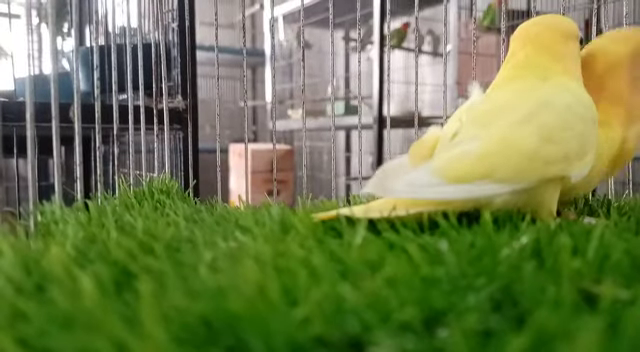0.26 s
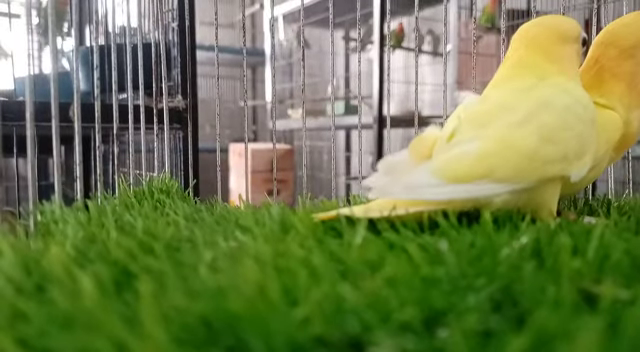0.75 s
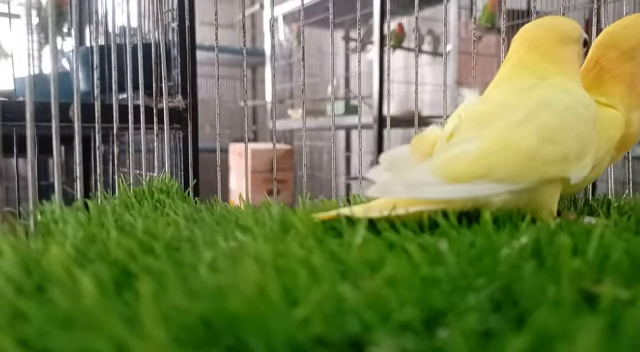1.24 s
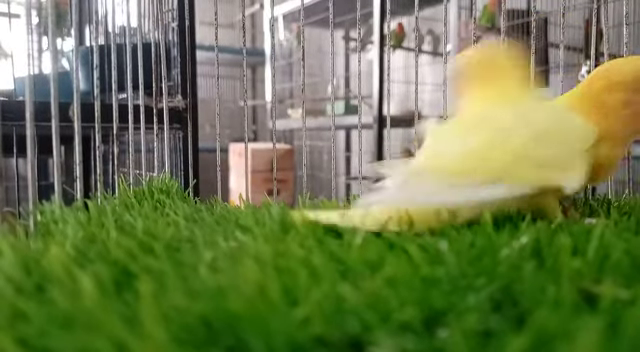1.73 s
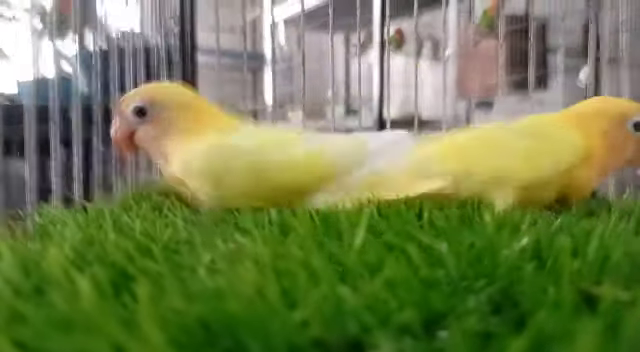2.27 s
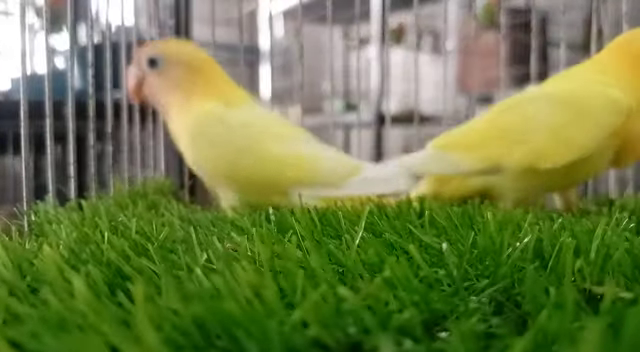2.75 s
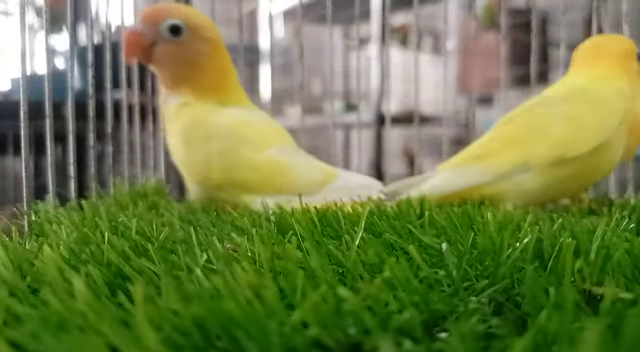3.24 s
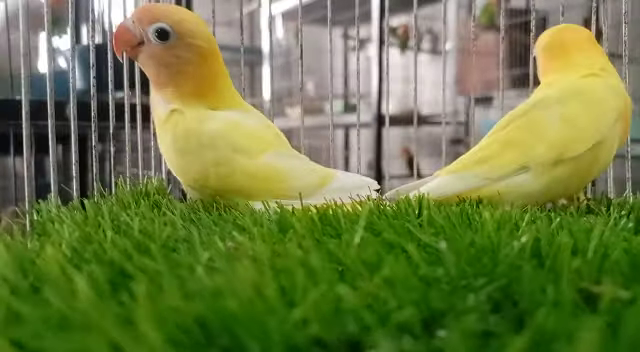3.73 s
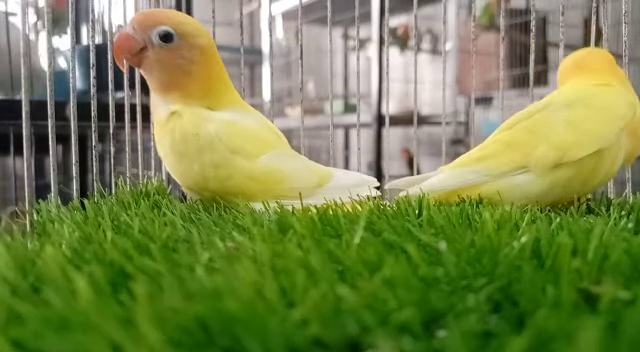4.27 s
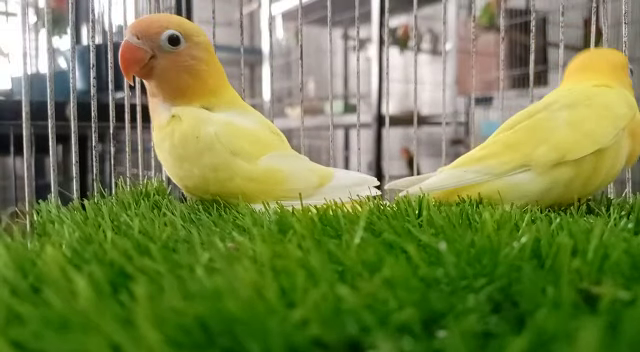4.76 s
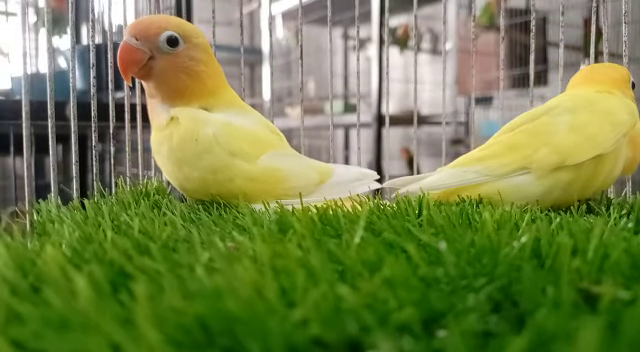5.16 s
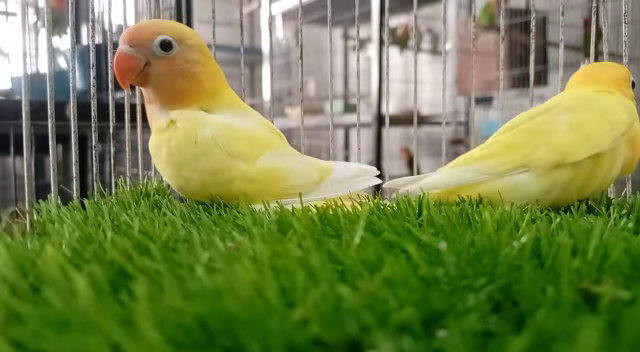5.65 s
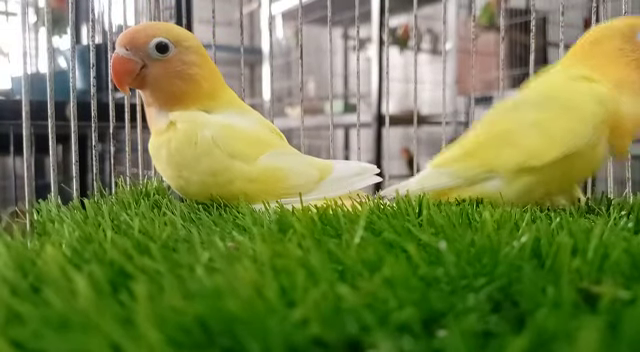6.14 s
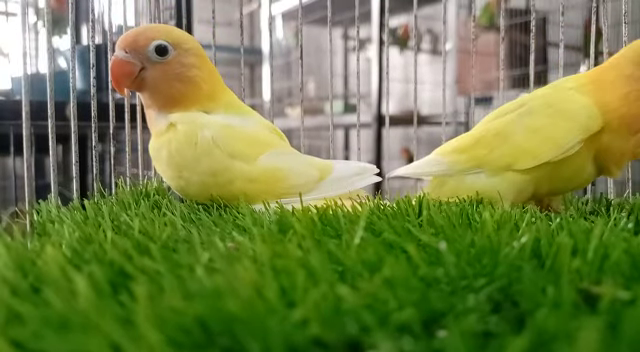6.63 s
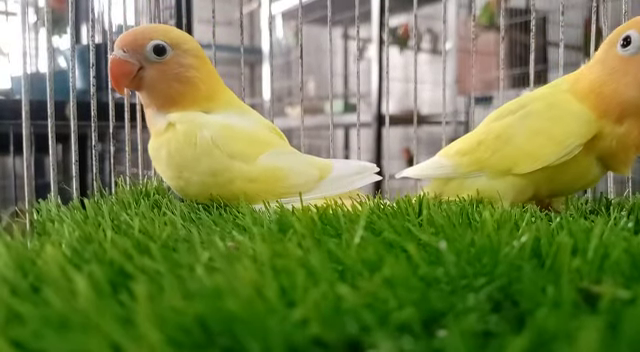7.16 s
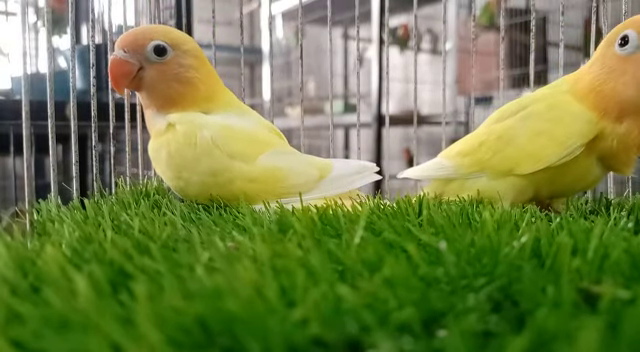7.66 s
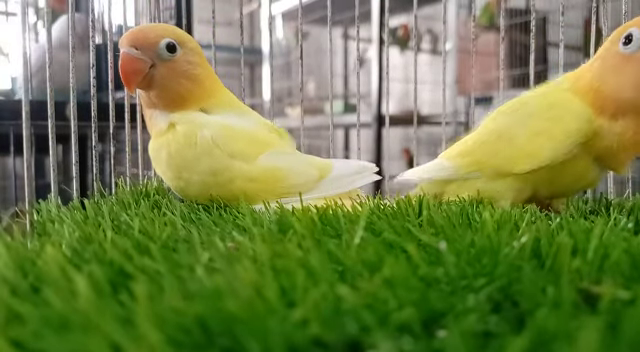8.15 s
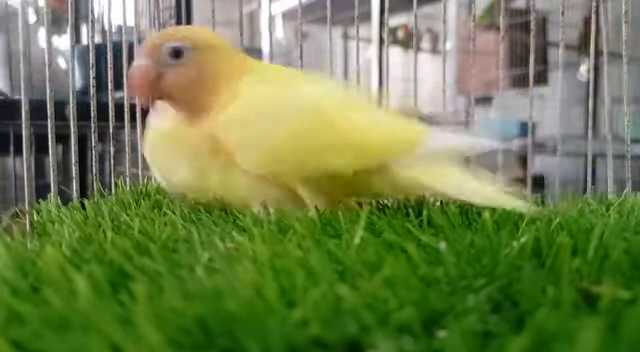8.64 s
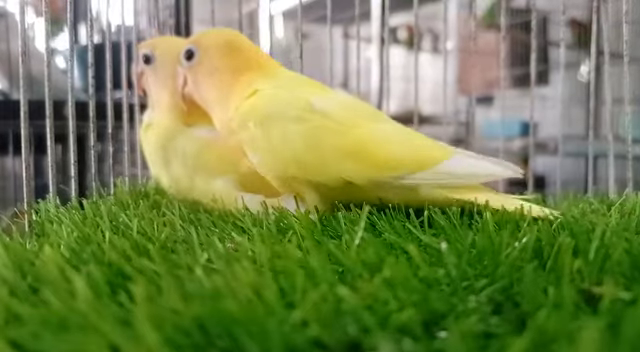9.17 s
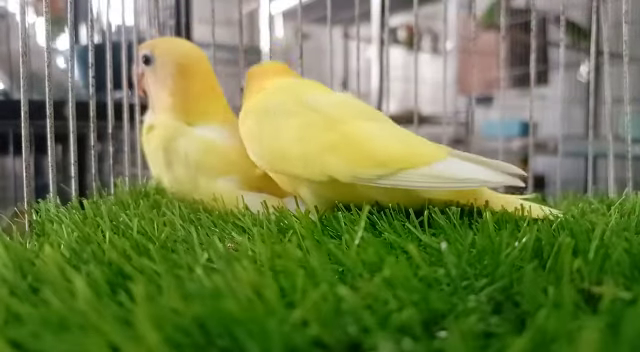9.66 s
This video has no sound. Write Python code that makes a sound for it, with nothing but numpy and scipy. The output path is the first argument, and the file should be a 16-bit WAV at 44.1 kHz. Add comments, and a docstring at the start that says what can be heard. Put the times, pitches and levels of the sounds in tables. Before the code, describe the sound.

Close, bright lovebird calls bounce off hard walls, with a reverberant flock behind. Fast chips dominate the first two and a half seconds, then a rasp, soft whistles and a short lull. Scattered chips and low padded hops follow; from about five seconds the chatter is dense and rasping. A flurry of heavier hops comes near eight and a half seconds, close to the ground-level microphone, before final screeches.

```python
"""Lovebirds in a hard-walled aviary

Lovebirds give quick hooked chips, whistles and rasping screeches, synthesized as harmonics on a moving
pitch, roughened and filtered by throat and beak. Short calls from a flock twitter behind them, mostly as
reverberation. A larger bird calls once, lower, and one tick is heard from the wire. Birds shuffle and hop
on the artificial turf where the microphone lies: low filtered noise, over a steady background."""
import sys
import numpy as np
from scipy import signal
from scipy.fft import rfft, irfft, next_fast_len
from scipy.io import wavfile
from scipy.ndimage import uniform_filter1d, minimum_filter1d

SR = 44100
rng = np.random.default_rng(int(sys.argv[2]) if len(sys.argv) > 2 else 0)


def transcribe(u):
    """Save the signal u as a 16-bit wav file named by the first command-line argument.

    u: samples, shape (n,) or (channels, n), limited to [-1, 1]; the rate is SR.
    q: integer samples, one column per channel.
    """
    v = np.clip(np.atleast_2d(u).T, -1, 1)
    q = np.round(v * 32767).astype(np.int16)
    wavfile.write(sys.argv[1], SR, q)


N = 436590  # length [samples]

# All table levels are relative: each layer adds its own offset.
# bouts of twitter from the flock at the back: (start [s], end [s], level [dB])
FLOCK_BOUTS = [(0.0, 0.564, -12), (0.697, 1.08, -9), (1.22, 1.72, -13), (1.95, 2.45, -14),
               (2.502, 2.97, -11.5), (5.895, 6.578, -12), (6.798, 7.52, -11.5), (7.851, 8.475, -8.5),
               (9.58, 9.9, -8)]
# transmission of a lovebird's throat: (frequency [Hz], level [dB])
LOVEBIRD_THROAT = [(1400, -38), (1950, -12), (2400, -6), (3100, 7.5), (3700, 9.5), (4700, 8), (5600, 5.5),
                   (6500, 8.5), (7400, 2), (8400, -25.5)]
# course of the larger bird's call: (time [s], pitch [Hz], level [dB])
SQUAWK_CONTOUR = [(1.165, 755, -36), (1.184, 873, -26.5), (1.21, 1092, -25), (1.245, 926.5, -27.5),
                  (1.307, 912, -24), (1.359, 867, -31), (1.388, 763, -22.5), (1.412, 609, -29.5),
                  (1.44, 476, -29.5)]
# transmission of the larger bird's throat: (frequency [Hz], level [dB])
LARGER_THROAT = [(480, -4), (950, -10.5), (1350, -12), (1850, 3.5), (2750, 2.5), (3550, -20), (5000, -39)]
# heavier footfalls and hops on the turf: (time [s], level [dB])
FOOTFALLS = [(0.789, -33), (1.942, -24), (2.144, -27), (2.249, -29), (2.334, -24.5), (2.921, -33.5),
             (3.221, -26), (3.259, -29), (3.865, -20.5), (4.026, -28.5), (4.21, -26.5), (4.272, -23.5),
             (4.533, -21.5), (4.703, -26.5), (4.769, -25), (5.13, -29.5), (5.258, -23.5), (5.966, -26.5),
             (6.5, -35), (6.866, -23), (7.889, -27), (8.339, -20.5), (8.488, -22), (8.56, -16.5),
             (8.727, -19), (9.216, -26)]
# spectrum of contact with the turf: (frequency [Hz], level [dB])
TURF_SPECTRUM = [(20, -55.5), (35, -25.5), (55, -15.5), (80, -2), (125, 2.5), (190, -1.5), (300, -9),
                 (450, -18), (900, -58)]
# spectrum of the steady background: (frequency [Hz], level [dB])
AIR_SPECTRUM = [(25, -37.5), (50, -16), (90, -4.5), (200, -10.5), (380, -6.5), (600, -11.5), (830, -11),
                (1300, -15), (2400, -21.5), (5000, -31), (7000, -31), (8400, -54)]
# runs of hooked chips, each chip trailing a short note: (first time [s], last time [s], chips [count],
# slowing [share], first level [dB], last level [dB], first reference pitch [Hz],
# last reference pitch [Hz], note pitch [Hz], note level [dB])
RUNS_OF_CHIPS = [ (0.0822, 0.4966, 6, -0.048, -27, -19.5, 5940, 5560, 3100, -39),
                 (0.668, 1.0866, 4, -0.052, -14.5, -16.5, 4810, 4690, 3005, -31),
                 (1.1687, 1.5175, 5, 0.1, -12, -19.5, 6110, 5550, 2630, -34.5),
                 (1.697, 2.48, 10, 0.12, -16.5, -12.5, 5003, 5113, 5015, -25.5),
                 (3.999, 4.105, 2, -0.02, -19, -20.5, 5620, 6270, 2320, -47),
                 (4.193, 4.471, 4, 0.028, -16.5, -15.5, 4877, 4425, 2663, -40),
                 (4.565, 4.656, 2, 0, -21, -16.5, 4570, 4830, 2500, -37),
                 (5.468, 5.524, 3, -0.37, -14.5, -11, 4360, 4754, 2235, -34.5),
                 (5.7673, 6.0115, 4, 0.056, -11, -27, 4956, 4490, 2200, -40.5),
                 (6.138, 6.2549, 4, 0.35, -6.5, -12, 4675, 4585, 2325, -39),
                 (6.3648, 6.5241, 3, 0.025, -8, -10, 4795, 4894, 2330, -33.5),
                 (6.9035, 7.1613, 3, -0.04, -11.5, -7.5, 6930, 4840, 3250, -30.5),
                 (8.9124, 9.0954, 2, -0.13, -12.5, -20, 6030, 6040, 2910, -39)]
# clear whistles: (time [s], length [s], level [dB], pitch [Hz], glide [share of pitch],
# beak resonance [Hz])
CLEAR_WHISTLES = [ (0.089, 0.034, -19.5, 2094, 0.01, 6400), (1.436, 0.03, -20, 3298, -0.07, 6700),
                  (2.28, 0.022, -28, 2260, 0.08, 2120), (2.663, 0.033, -24.5, 2374, 0.14, 2380),
                  (2.841, 0.04, -21, 2417, 0.014, 4800), (2.933, 0.033, -23, 2206, -0.064, 7400),
                  (2.953, 0.088, -18, 2584, 0.064, 4960), (3.049, 0.065, -22.5, 2430, -0.13, 4750),
                  (3.842, 0.017, -26, 2056, 0.096, 2000), (5.642, 0.022, -23.5, 3063, -0.21, 2980),
                  (6.365, 0.13, -26, 2263, 0, 2390), (6.603, 0.016, -12, 2635, -0.32, 5030),
                  (6.768, 0.044, -17.5, 3335, 0.065, 6600), (7.045, 0.022, -26.5, 3164, -0.092, 3200),
                  (7.66, 0.078, -20.5, 2287, 0.07, 2445), (7.804, 0.014, -14, 3230, -0.036, 6440),
                  (7.826, 0.021, -11.5, 3320, 0.115, 6740), (7.915, 0.068, -20.5, 2510, -0.03, 4960),
                  (8.455, 0.022, -27, 1950, -0.062, 3900), (8.734, 0.04, -27, 2360, 0.043, 3330),
                  (8.958, 0.015, -9, 2910, 0.085, 5800), (9.035, 0.018, -20, 3650, 0.41, 4050),
                  (9.2, 0.035, -27, 2877, -0.094, 2800)]
# rasping screeches: (time [s], length [s], level [dB], beak resonance [Hz], roughness [1])
RASPING_SCREECHES = [ (0.0, 0.03, -11.5, 5215, 0.81), (0.126, 0.12, -21.5, 4910, 0.61),
                     (0.343, 0.09, -24, 4840, 0.52), (0.701, 0.029, -20, 5910, 0.6),
                     (0.82, 0.06, -24, 5960, 0.35), (0.846, 0.03, -20, 4400, 0.41),
                     (0.962, 0.0714, -21.5, 4510, 0.51), (2.671, 0.17, -19.5, 5420, 1.05),
                     (2.982, 0.059, -15, 4400, 0.71), (4.514, 0.21, -32, 5170, 0.73),
                     (4.907, 0.052, -35, 6090, 0.52), (5.343, 0.11, -21, 5560, 0.75),
                     (5.44, 0.031, -19, 4340, 0.41), (5.659, 0.09, -20, 5845, 0.82),
                     (5.736, 0.12, -19, 4516, 0.58), (5.871, 0.13, -26, 4160, 0.82),
                     (6.003, 0.077, -25, 3230, 0.67), (6.078, 0.046, -13.5, 5340, 0.63),
                     (6.492, 0.11, -23.5, 4640, 1.11), (6.711, 0.035, -21.5, 3810, 0.68),
                     (6.732, 0.067, -18, 6720, 0.57), (6.827, 0.064, -29, 3760, 0.57),
                     (6.904, 0.053, -19, 6210, 0.73), (6.972, 0.049, -26, 4680, 0.8),
                     (7.241, 0.3, -21.5, 6350, 0.73), (7.737, 0.062, -17, 5820, 0.8),
                     (7.992, 0.19, -15, 6085, 1.1), (8.12, 0.2, -15, 5950, 0.9),
                     (8.328, 0.091, -25.5, 4560, 1.1), (8.511, 0.076, -20, 4310, 0.7),
                     (8.754, 0.071, -25, 6510, 0.29), (8.885, 0.043, -17, 4840, 0.65),
                     (8.936, 0.023, -13.5, 6050, 0.4), (9.054, 0.088, -18.5, 4664, 0.88),
                     (9.378, 0.043, -16, 5526, 0.5), (9.416, 0.15, -18.5, 6380, 0.83),
                     (9.638, 0.053, -16.5, 5540, 0.58), (9.7, 0.16, -22, 4040, 0.88),
                     (9.785, 0.086, -17.5, 5610, 1.21)]
# spells of feet and tails rubbing the turf: (start [s], end [s], level [dB])
RUBBING_SPELLS = [(1.954, 2.35, -41.5), (2.55, 3.45, -47), (4.168, 4.488, -41.5), (4.703, 4.975, -33.5),
                  (5.55, 6.802, -45), (8.25, 8.753, -36), (8.875, 9.296, -42)]


def undb(db):
    """Amplitude ratio: a gain is ten to the power of its decibels over twenty."""
    return 10 ** (np.asarray(db) / 20)


def unit(x):
    """Normalization: division by the root mean square sets it to 1."""
    return x / np.sqrt(np.mean(x ** 2) + 1e-18)


def gain_at(hz, points):
    """Spectral envelope: decibels interpolated along logarithmic frequency."""
    f, db = np.transpose(points)
    return undb(np.interp(np.log(hz + 1), np.log(f), db))


def colour(x, points):
    """Linear filtering: the spectrum is multiplied by an envelope, then scaled to rms 1."""
    n = next_fast_len(len(x) + 256)
    spectrum = rfft(x, n) * gain_at(np.fft.rfftfreq(n, 1 / SR), points)
    return unit(irfft(spectrum, n)[:len(x)])


def noise(n, points):
    """Coloured noise: white noise shaped by a spectral envelope, rms 1."""
    return colour(rng.standard_normal(n), points)


def wobble(t, hz):
    """Random modulation: straight lines join random values drawn hz times a second."""
    values = rng.standard_normal(4096)
    return np.interp(t * hz % 4095, np.arange(4096), values)


def add(out, s, x):
    """Superposition: x is summed into out from time s [s]."""
    i = int(np.clip(s * SR, 0, N))
    out[i:i + len(x)] += x[:N - i]


def syrinx(hz, first=0.86, count=5):
    """Harmonic series: integer multiples of a moving pitch; first weights the fundamental."""
    phase = 2 * np.pi * np.cumsum(hz) / SR
    # partials above a quarter of the sample rate are left out
    overtones = sum((k * hz < SR / 4) * np.sin(k * phase) for k in range(2, count + 1))
    return unit(first * np.sin(phase) + overtones)


def beak(x, hz, width_hz=1100, boost=1.89):
    """Resonance: the open beak reinforces one band; rms 1."""
    hz = np.clip(hz, 1000, SR / 4)
    b, a = signal.iirpeak(hz, hz / width_hz, SR)
    return unit(x + boost * signal.lfilter(b, a, x))


def lovebird(hz, rough, beak_hz, full_hz=2550, fade=4.3, jitter=.1, rasp_hz=1800, flutter=.07,
             flutter_hz=260, pulse_hz=300, pulse_db=8, stutter_db=5, hiss=1.0):
    """Chaotic phonation: a pressed syrinx scatters its pitch and beats in uneven, hissing pulses."""
    t = np.arange(len(hz)) / SR
    chaos = jitter * wobble(t, rasp_hz) + flutter * wobble(t, flutter_hz)
    unsteady_hz = hz * np.exp(rough * chaos + 0.01384 * wobble(t, 138.3))
    # high notes sung on the second harmonic lose their fundamental
    first = np.where(beak_hz > 1.3 * hz, np.minimum((full_hz / hz) ** fade, 1.6), 1)
    source = syrinx(unsteady_hz, first) + hiss * rough * rng.standard_normal(len(t))
    beat_hz = pulse_hz * np.exp(.4 * wobble(t, 200.6))
    beat = np.sin(2 * np.pi * np.cumsum(beat_hz) / SR)
    stutter = np.tanh(wobble(t, 110))
    pulses = undb(np.sqrt(abs(rough)) * (pulse_db * beat + stutter_db * stutter))
    return beak(colour(source * pulses, LOVEBIRD_THROAT), beak_hz)


def held_call(length, start_hz, end_hz, rough, beak_hz, attack=0.03, release=0.072):
    """Gliding tone: pitch moves linearly; attack and release are shares of the length [s]."""
    u = np.linspace(0, 1, int(max(length, .01) * SR))
    swell = np.minimum(u / attack, 1) * np.minimum((1 - u) / release, 1)
    return swell * lovebird(start_hz + u * (end_hz - start_hz), rough, beak_hz)


def screech(length, beak_hz, rough, typical_hz=2458, typical_beak_hz=5194, follow=0.58, glide=0.0406):
    """Coupled source and resonator: pitch rises with beak resonance by a power law, and in the note."""
    hz = typical_hz * (beak_hz / typical_beak_hz) ** follow
    return held_call(length, hz * (1 - glide / 2), hz * (1 + glide / 2), rough, beak_hz,
                     attack=0.11, release=0.15)


def near_birds(whistle_db=-2, screech_db=-2):
    """Superposition of near sources: chips, whistles and screeches of the nearest lovebirds."""
    out = chip_runs()
    for s, length, db, hz, glide, beak_hz in CLEAR_WHISTLES:
        add(out, s, undb(db + whistle_db) * whistle(length, hz, glide, beak_hz))
    for s, length, db, beak_hz, rough in RASPING_SCREECHES:
        add(out, s, undb(db + screech_db) * screech(length, beak_hz, rough))
    return out


def flock(flock_db=-12, pitch_hz=2500, spread=.11, rough=0.504, fade_s=0.19, fade_db=-3):
    """Statistical texture: short calls of scattered pitch, glide, level and timing form each bout."""
    out = np.zeros(N)
    for start, end, db in FLOCK_BOUTS:
        for s in np.arange(start, end, 1 / 26):  # 26 calls a second
            pitch, glide, size, delay = np.clip(rng.standard_normal(4), -2, 2)
            hz = pitch_hz * np.exp(spread * pitch)
            call = held_call(0.03, hz, hz * np.exp(0.23 * glide), rough, 2 * hz)
            # a bout swells in and thins out
            fade = fade_db * np.exp(-min(s - start, end - s) / fade_s)
            add(out, s + 0.0071 * delay, undb(db + fade + flock_db + size) * call)
    return out


def feet(step_db=-6.5, rise_s=0.0098, shuffle_db=-4, patchy_db=4.0, fidget_db=-59.5, fade_s=0.093):
    """Friction and impact: patchy low noise for rubbing, brief noise pulses for steps on the turf."""
    t = np.arange(N) / SR
    rubbing = undb(fidget_db)  # light rubbing throughout
    for start, end, db in RUBBING_SPELLS:
        spell = np.interp(t, [start - fade_s, start, end, end + fade_s], [0, 1, 1, 0])
        rubbing = rubbing + undb(db) * spell
    out = noise(N, TURF_SPECTRUM) * rubbing * undb(shuffle_db + patchy_db * wobble(t, 27))
    age = t[:SR // 8] / rise_s
    push = age * np.exp(1 - age)  # peaks at 1 after rise_s
    for s, db in FOOTFALLS:
        thud = unit(noise(len(age), TURF_SPECTRUM) * push) * np.sqrt(np.mean(push ** 2))
        add(out, s, undb(db + step_db) * thud)
    return out


def air(level_db=-47):
    """Stationary noise: a steady background of fixed spectrum."""
    return undb(level_db) * noise(N, AIR_SPECTRUM)


def aviary(x, t60=0.56, early_db=5, early_s=0.012, gap_s=0.0043):
    """Reverberation: convolution with sparse early reflections and a dense tail, of unit energy."""
    t = np.arange(SR) / SR
    # on average one sample in 64 carries a reflection
    early = rng.standard_normal(SR) * (rng.random(SR) < 1 / 64) * np.sqrt(64)
    tail = rng.standard_normal(SR) * np.exp(-np.log(1000) * t / t60)  # falls 60 dB in t60 [s]
    response = (tail + undb(early_db) * early * np.exp(-t / early_s)) * (t > gap_s)
    return signal.fftconvolve(x, response / np.linalg.norm(response))[:N]


def chip_runs(chip_db=-7, note_db=-2, rough=0.45, lead_s=.003, note_delay_s=0.012,
              swell_db=2.5, scatter=0.025):
    """Rhythmic succession: pace slackens or quickens while level and pitch slide along each run."""
    out = np.zeros(N)
    for (first, last, count, slowing, first_db, last_db,
         first_hz, last_hz, note_hz, note_level) in RUNS_OF_CHIPS:
        for u in np.linspace(0, 1, int(round(count))):
            arch = u * (1 - u)
            s = first + (last - first) * (u - slowing * arch)
            # a run is louder in its middle
            db = first_db + u * (last_db - first_db) + swell_db * np.sin(np.pi * u)
            hz = (first_hz + u * (last_hz - first_hz)) * np.exp(scatter * rng.standard_normal())
            add(out, s - lead_s, undb(db + chip_db) * chip(hz, rough))
            add(out, s + note_delay_s, undb(note_level + note_db) * trailing_note(note_hz))
    return out


def chip(top_hz, rough, length=.028):
    """Frequency modulation: low chips dip and leap nearly an octave; shrill ones flick up, then fall."""
    u = np.linspace(0, 1, int(length * rng.uniform(0.81, 1.1) * SR))
    swell = np.interp(u, [0, .05, .35, .55, .8, 1], [0.32, 0.69, 1.0, 1, 0.64, 0])
    # hoarse at first
    hoarse = rough * np.interp(u, [0, .3, .45, .65, 1], [0.98, 0.67, 1.7, 0.24, 0.16])
    if top_hz > 5400:  # shrill: the second harmonic lies near top_hz
        hook = np.interp(u, [0, .25, .5, 1], [0.32, 0.59, .53, 0.4])
    else:
        hook = np.interp(u, [0, .15, .36, .48, 1], [.58, .52, .53, 1.02, 0.9])
    return swell * lovebird(top_hz * hook, hoarse, top_hz)


def whistle(length, hz, glide, beak_hz):
    """Nearly periodic phonation: little roughness leaves a clear note gliding through its pitch."""
    return held_call(length, hz * (1 - glide / 2), hz * (1 + glide / 2), 0.15, beak_hz)


def trailing_note(hz, length=0.05, glide=-0.02, rough=0.3, scatter=0.017):
    """Resonance tuning: the beak reinforces the fundamental of a slightly hoarse, falling note."""
    hz = hz * np.exp(scatter * rng.standard_normal())
    return held_call(length, hz, hz * (1 + glide), rough, hz)


def larger_bird(squawk_db=-2, jitter=0.011):
    """Source and filter: harmonics on an arched pitch pass a nasal throat and fall away at the end."""
    times, pitch, db = np.transpose(SQUAWK_CONTOUR)
    t = np.arange(times[0], times[-1], 1 / SR)
    hz = np.interp(t, times, pitch) * (1 + jitter * wobble(t, 900))
    call = colour(syrinx(hz), LARGER_THROAT)
    out = np.zeros(N)
    add(out, times[0], call * undb(np.interp(t, times, db) + squawk_db))
    return out


def cage_tick(s=3.754, db=-36, decay_s=0.0059):
    """Damped impact: a beak or claw taps the wire, heard as bright noise dying exponentially."""
    t = np.arange(SR // 30) / SR
    click = noise(len(t), [(1000, -28), (2800, 2), (6500, 0), (8000, -19)])
    out = np.zeros(N)
    add(out, s, undb(db) * np.exp(-t / decay_s) * click)
    return out


def scene(direct_db=-1, room_db=-2):
    """Direct and reverberant fields: near birds reach us by both, the flock almost only off the walls."""
    near = near_birds() + larger_bird() + cage_tick()
    far = flock()
    direct = undb(direct_db) * (near + 0.17 * far)
    reverberant = aviary(undb(room_db) * near + far)
    return (direct + reverberant + feet() + air())[None]


def record(dry, limit_db=-7, hold_s=0.026, top_hz=8450):
    """Limiting and low-pass filtering: the recorder holds high peaks down and cuts the top steeply."""
    size = max(int(hold_s * SR), 1)
    highest = -minimum_filter1d(-abs(dry), size)
    peak = uniform_filter1d(highest, size)
    limited = dry / (1 + (peak / undb(limit_db)) ** 4) ** (1 / 4)
    return signal.sosfilt(signal.ellip(10, .2, 70, top_hz, fs=SR, output="sos"), limited)


dry = scene()
out = record(dry)
transcribe(out)
```